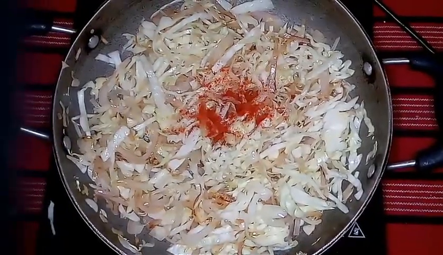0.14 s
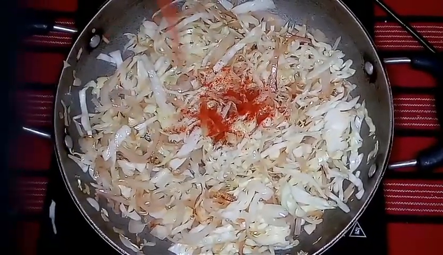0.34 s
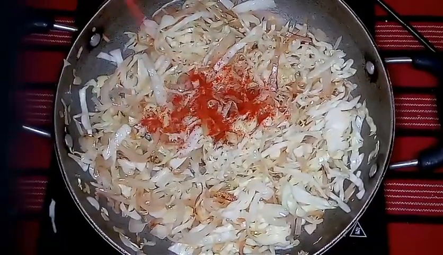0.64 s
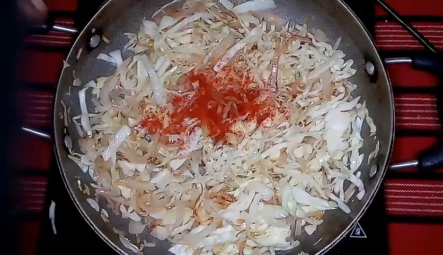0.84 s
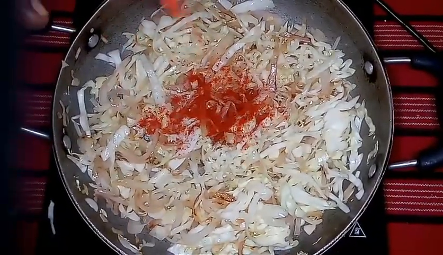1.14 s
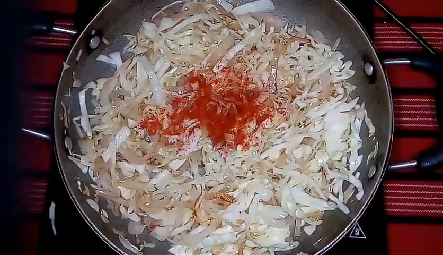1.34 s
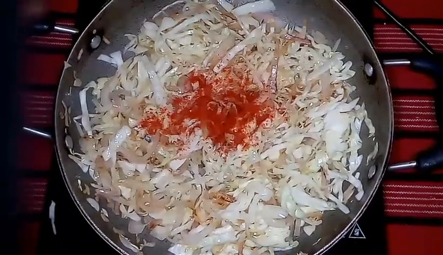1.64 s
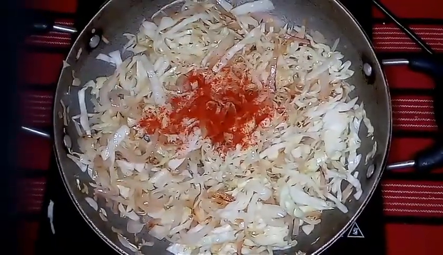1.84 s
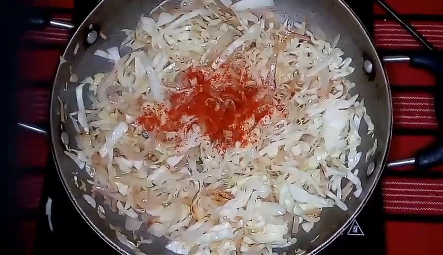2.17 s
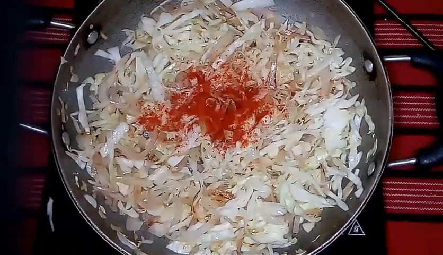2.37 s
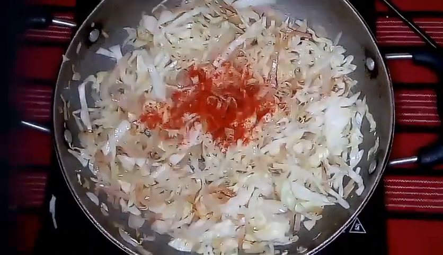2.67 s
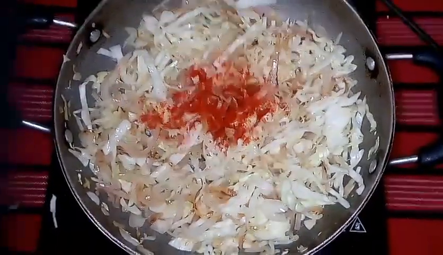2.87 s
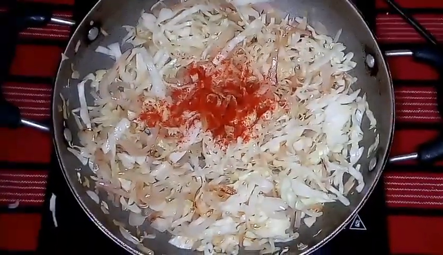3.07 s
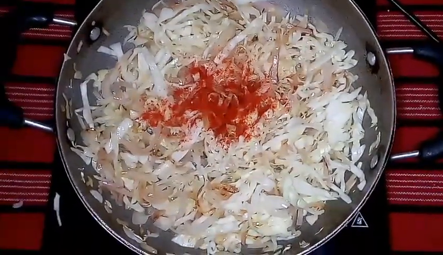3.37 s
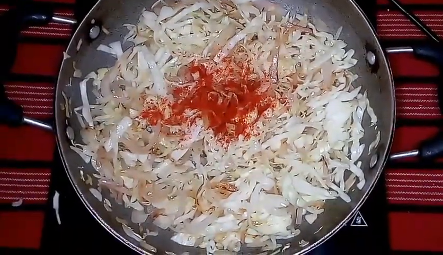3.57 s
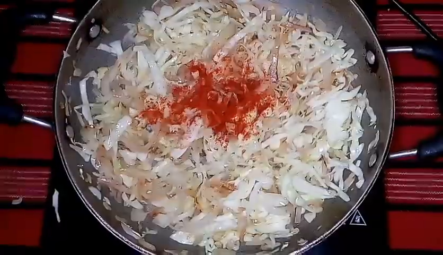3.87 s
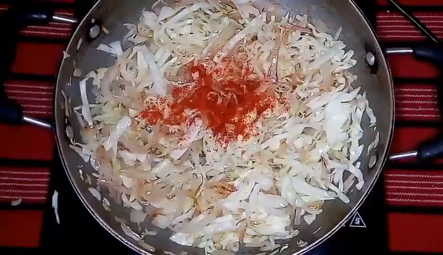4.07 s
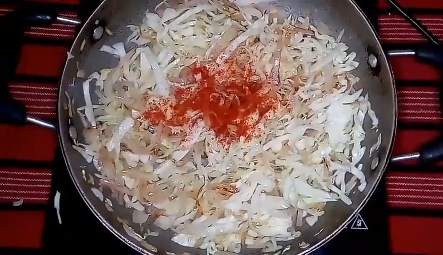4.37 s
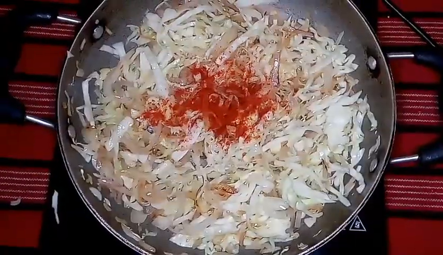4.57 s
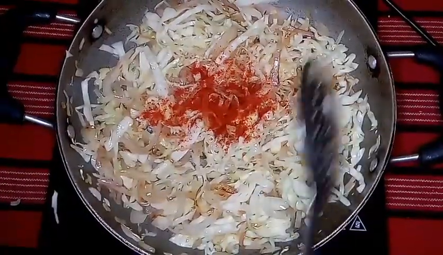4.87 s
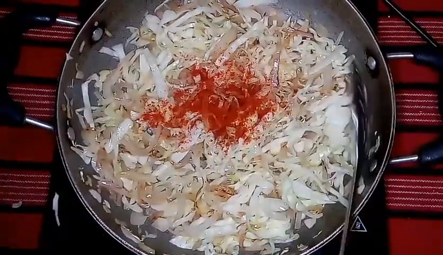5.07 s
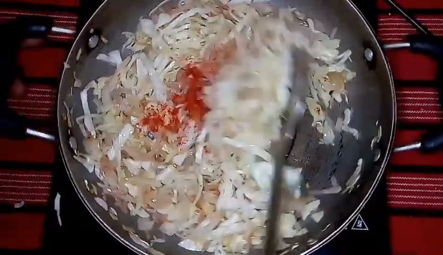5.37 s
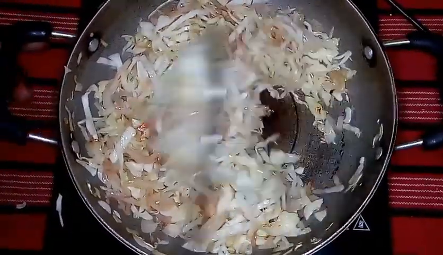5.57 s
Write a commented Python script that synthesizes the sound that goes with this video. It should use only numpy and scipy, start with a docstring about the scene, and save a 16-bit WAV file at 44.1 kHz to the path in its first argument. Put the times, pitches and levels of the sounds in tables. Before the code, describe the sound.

Close above a steel pan in a small kitchen, sliced onions sizzle evenly with small oil snaps, over a low induction hum and soft fan air. A few faint dull bumps come and go. Just after five seconds a spatula knocks the pan, scrapes, groans briefly and crunches through the onions, making the frying flare. One close microphone, centred, with a short room tail.

```python
"""Close above a steel pan on an induction cooktop, one microphone hears sliced onions sizzle from the start.
The coil hums at twice the mains frequency, the fan whirs under the plate: sines, and noise through resonances.
Steam bursts are random clicks and hiss, coloured; now and then a droplet snaps, or a dull or hollow note sounds.
Near the end a spatula scrapes, crunches, knocks and groans on the pan: clicks, ringing modes and gliding sines.
Its shoves make the frying flare; a short tail from the nearby walls follows all but the coil and fan."""
import sys
import numpy as np
from scipy import signal
from scipy.fft import rfft, irfft, next_fast_len
from scipy.io import wavfile

SR = 44100
rng = np.random.default_rng(int(sys.argv[2]) if len(sys.argv) > 2 else 0)


def persist_wave(psi):
    """Save psi, clipped to +-1, as 16-bit WAV."""
    counts = np.round(np.clip(psi, -1, 1) * 32767).astype(np.int16)
    wavfile.write(sys.argv[1], SR, np.atleast_2d(counts).T)


N = 252290
TIME = np.arange(N) / SR  # seconds

# Colour of the bursting steam bubbles. Each row: frequency in Hz, relative spectrum level in dB.
SIZZLE_COLOUR = [(700, -36), (1600, -15.5), (2400, -15), (3000, -12), (3400, -8), (4500, -1.5), (5400, 0),
                 (6500, -0.5), (6800, -5.5), (7400, -8.5), (8000, -15), (9900, -22), (11300, -29),
                 (13000, -31), (15400, -56)]
# Low modes of the loaded pan and spatula. Each row: frequency in Hz, relative level in dB, t60 in seconds.
PAN_MODES = [(338, -8, 0.063), (404, -6, 0.1), (470, -0.5, 0.061), (625, -14, 0.06), (694, -10, 0.076)]
# Clanking modes of the pan's wall. Each row: frequency in Hz, relative level in dB, t60 in seconds.
WALL_MODES = [(897, -17, .075), (1070, -15, .06), (1190, -8.5, .085), (1337, -9, .075), (1470, -17, .05),
              (1985, -11, .06), (2190, -14, .06)]
# Bright modes of the steel rim. Each row: frequency in Hz, relative level in dB, t60 in seconds.
RIM_MODES = [(2610, -10, 0.047), (4170, -19, 0.036), (5080, -0.5, 0.053), (5600, -11, .04),
             (7560, -20, .025)]
# Shoves of the spatula. Each row: start in seconds, length in seconds, then the levels that a long shove
# would reach: edge in dB, dull rubbing in dB, flare of the frying in dB, crunch of the onions in dB.
SHOVES = [(5.173, 0.01, -46, -48, -46, -44), (5.22, 0.029, -52, -38, -42, -42),
          (5.292, 0.071, -62, -44, -43, -40), (5.383, 0.038, -48, -56, -34.5, -36),
          (5.565, 0.061, -56, -72, -41.5, -43)]
SHOVE_ATTACK_S, SHOVE_RELEASE_S = 0.006, 0.025


def from_db(db):
    """Decibels to gain."""
    return 10 ** (np.asarray(db) / 20)


def rms_one(x):
    """Scale to unit power."""
    return x / np.sqrt(np.mean(x ** 2) + 1e-20)


def in_time(rows):
    """The columns of a curve, one value per sample."""
    s, *columns = np.transpose(rows)
    return [np.interp(TIME, s, column) for column in columns]


def drift(rate_hz):
    """Slow random curve of rms 1: noise through two equal low-pass poles, made at every 40th sample."""
    r = np.exp(-80 * np.pi * rate_hz / SR)
    noise = rng.standard_normal(N // 40 + 2002)
    slow = signal.lfilter([1], [1, -2 * r, r * r], noise)[2000:]  # drop the filter's run-in
    return np.interp(np.arange(N) / 40, np.arange(len(slow)), rms_one(slow))


def colour(x, spectrum):
    """Causal (minimum-phase) filter that follows a spectrum."""
    hz, db = np.transpose(spectrum)
    size = 2 * next_fast_len(N // 2 + 4096)
    grid = np.maximum(np.arange(size // 2 + 1) * SR / size, 1)
    gain = from_db(np.interp(np.log(grid), np.log(hz), db))
    # folding the cepstrum onto positive times gives the minimum phase
    cepstrum = irfft(np.log(gain))
    cepstrum[1:size // 2] *= 2
    cepstrum[size // 2 + 1:] = 0
    return irfft(rfft(x, size) * np.exp(rfft(cepstrum)))[:N]


def resonate(x, hz, width_hz):
    """One two-pole resonance with a gain of about 1 at its peak."""
    r = np.exp(-np.pi * width_hz / SR)
    zeros = np.array([1, 0, -1]) * (1 - r * r) / 2
    poles = [1, -2 * r * np.cos(2 * np.pi * hz / SR), r * r]
    return signal.lfilter(zeros, poles, x)


def ring(clicks, hz, t60):
    """A unit click sets a decaying sine of starting height 1 ringing."""
    r = np.exp(-np.log(1000) / (t60 * SR))
    w = 2 * np.pi * hz / SR
    return signal.lfilter([0, np.sin(w)], [1, -2 * r * np.cos(w), r * r], clicks + 1e-18)


def clicks_at(times, db):
    """Single clicks of given strengths."""
    out = np.zeros(N)
    np.add.at(out, np.round(np.asarray(times) * SR).astype(int), from_db(db))
    return out


def grains(per_s, spread_db, largest):
    """Random clicks of either sign, many small and a few large; rms 1."""
    steps = np.minimum(rng.exponential(1, N), largest)
    sizes = from_db(spread_db * steps) * rng.choice([-1, 1], N)
    return rms_one(sizes * (rng.random(N) < per_s / SR))


def tone(hz):
    """A sine of rms 1 that follows a pitch curve from a random phase."""
    return np.sqrt(2) * np.sin(2 * np.pi * (np.cumsum(hz) / SR + rng.random()))


def swell(start, length, attack, release):
    """Envelope that rises towards 1 for a length, then dies away; times in seconds."""
    since = np.maximum(TIME - start, 0)
    return (1 - np.exp(-since / attack)) * np.exp(-np.maximum(since - length, 0) / release)


def dying(times, db, decay_s):
    """Envelope that jumps at given times and dies away."""
    return signal.lfilter([1], [1, -np.exp(-1 / (decay_s * SR))], clicks_at(times, db) + 1e-18)


def coil(flutter_db=0.48, octave_db=-33):
    """The field pulls on the pan twice per mains cycle: an almost pure hum with a faint octave."""
    # Hum under the resting pan. Each row: time in seconds, level in dB.
    resting_hum = [(0.1, -40), (2.12, -39.5), (2.24, -40), (2.77, -40.5), (3.51, -42), (5.0, -41)]
    level_db, = in_time(resting_hum)
    # the spatula's weight damps the hum
    damping_db = -3 * swell(start=5.23, length=0.47, attack=0.014, release=0.014)
    # the pan rocks and hums louder for a moment
    rocking_db = 7.5 * np.exp(-((TIME - 5.395) / 0.014) ** 2)
    pitch = np.full(N, 100.06)  # Hz
    hum = tone(pitch) + from_db(octave_db) * tone(2 * pitch)
    return from_db(level_db + damping_db + rocking_db + flutter_db * drift(3.9)) * hum


def fan(turn_hz=49.45, whine_hz=1129.3, air_db=-50.5, whine_db=-63.5, gust_db=0.7, wobble=0.00063, waver_db=1):
    """Turbulent air rings the housing; rotor tones and the motor's whine share one slightly wobbling speed."""
    # Air rushing through the housing. Each row: frequency in Hz, relative spectrum level in dB.
    air_colour = [(20, -5), (45, -10), (75, 1.5), (125, 5.5), (170, -2.5), (260, 2), (420, 0), (505, 2.5),
                  (540, -2.5), (585, 3), (640, 0.5), (900, -2), (1120, -1.5), (1500, -16), (3000, -14.5),
                  (9000, -30.5)]
    # Steady tones of the fan. Each row: multiple of its turning rate, level in dB.
    rotor_orders = [(3, -62.5), (5, -68.5), (6, -66), (10, -61), (15, -70), (17, -73), (20, -66.5)]
    # Resonances of the housing. Each row: frequency in Hz, nominal width in Hz, level in dB.
    housing_modes = [(133, 3.3, -69), (330, 18.3, -54), (371.4, 11, -65), (416, 22, -62), (458, 32, -57),
                     (495.7, 16, -55), (617, 45, -59.5), (771.5, 34, -62.5), (1043, 19, -70.5),
                     (1359, 11.6, -70)]
    air = from_db(air_db) * rms_one(colour(rng.standard_normal(N), air_colour))
    gusts = gust_db * drift(1.7)  # the airflow is nearly even
    for hz, width, db in housing_modes:
        # two passes of twice the width make steeper skirts
        once = resonate(rng.standard_normal(N), hz, 2 * width)
        air += from_db(db + gusts) * rms_one(resonate(once, hz, 2 * width))
    speed = 1 + wobble * drift(1.88)
    rotor = np.zeros(N)
    for order, db in rotor_orders:
        rotor += from_db(db + waver_db * drift(4.2)) * tone(order * turn_hz * speed)
    whine = from_db(whine_db + waver_db * drift(1.7)) * tone(whine_hz * speed)
    return air + rotor + whine


def vigour(gain_db=-0.5, restless_db=0.5, flare_attack_s=0.023, flare_release_s=0.07):
    """Strength of the frying: a simmer, plus a flare per shove as wet onion lands on hot steel and dries off."""
    # Undisturbed frying. Each row: time in seconds, level in dB ahead of gain_db.
    simmer_levels = [(0.05, -39), (0.53, -37.5), (1.2, -39.5), (2.46, -38.5), (3.37, -38.5), (4.11, -39.5),
                     (5.15, -38.5)]
    level_db, = in_time(simmer_levels)
    simmer = from_db(gain_db + level_db + restless_db * drift(0.98))
    power = simmer ** 2
    for s, length, _, _, flare_db, _ in SHOVES:
        flare = from_db(flare_db) * swell(s, length, flare_attack_s, flare_release_s)
        power += flare ** 2
    return np.sqrt(power)


def frying(bubbles_per_s=9000, bubbles_db=-2, steam_db=-4.0, sputter_db=1.5,
           fizz_db=-8, fizz_per_s=140, fizz_width_hz=400, patchy_db=3.0):
    """Thousands of tiny steam bursts a second over a smooth hiss; some ring briefly at a pitch of their own."""
    sputter = from_db(bubbles_db + sputter_db * drift(23))
    bursts = sputter * grains(bubbles_per_s, spread_db=1.0, largest=4)
    fizz = np.zeros(N)
    for hz in np.linspace(2200, 14500, 36):
        # each wet spot fizzes at its own pitch, and comes and goes
        spot = resonate(grains(fizz_per_s, spread_db=1.0, largest=5.8), hz, fizz_width_hz)
        fizz += from_db(patchy_db * drift(9.1)) * spot
    steam = from_db(steam_db) * rng.standard_normal(N)
    sizzle = bursts + from_db(fizz_db) * rms_one(fizz) + steam
    # once the onions are pushed aside, the bare oil fizzes unmuffled above 12 kHz
    bare = rms_one(signal.sosfilt(signal.butter(2, 12000, "high", fs=SR, output="sos"), sizzle))
    since_bared = np.maximum(TIME - 5.38, 0)
    bared = from_db(-66 + 2 * drift(12)) * (1 - np.exp(-since_bared / 0.03))
    return vigour() * rms_one(colour(sizzle, SIZZLE_COLOUR)) + bared * bare


def pops(level_db=-0.5, width_hz=1500, ring_share=0.97, crack_db=-24, small_per_s=3.1, small_db=-28, small_spread_db=1.5):
    """Droplets burst with a snap; the larger ones add a short ring of their cavity."""
    # Loudest droplets in the oil. Each row: time in seconds, snap in dB ahead of level_db, bubble pitch in Hz.
    large_pops = [(0.349, -22, 2300), (0.4527, -21.5, 5100), (0.493, -24, 2400), (0.6974, -23, 3400),
                  (0.8386, -24, 5000), (2.0847, -23.5, 5500), (2.3891, -19, 5200), (3.1316, -24, 5600),
                  (3.193, -23.5, 5500), (3.3592, -24, 4800), (3.4615, -23.5, 5000), (3.4968, -20.5, 5400),
                  (5.2546, -16, 5000), (5.5715, -23.5, 4520), (5.581, -23.5, 5200)]
    # smaller droplets pop at random
    small_sizes = from_db(small_db + small_spread_db * rng.standard_normal(N))
    out = (rng.random(N) < small_per_s / SR) * small_sizes
    for s, db, hz in large_pops:
        snap = clicks_at([s], [db])
        out += snap + ring_share * resonate(snap, hz, width_hz)
    # the peak of one coloured unit click
    height = np.abs(colour(clicks_at([0], [0]), SIZZLE_COLOUR)).max()
    # a little of each snap reaches the microphone unmuffled by the onions
    crack = from_db(crack_db) * np.diff(out, prepend=0)
    return from_db(level_db) * (colour(out, SIZZLE_COLOUR) / height + crack)


def bumps(lowest_hz=50):
    """Dull, quickly damped knocks and a few faint hollow notes near 500 Hz: decaying sines, deep bass cut."""
    # Soft knocks and hollow notes. Each row: time in seconds, frequency in Hz, level in dB, t60 in seconds.
    soft_notes = [(2.088, 456, -37, 0.079), (2.59, 502, -37, 0.12), (2.672, 487, -39, 0.1),
                  (3.078, 323, -35, 0.078), (4.013, 247, -38, 0.056), (4.335, 253, -31, 0.033),
                  (5.194, 130, -35, 0.042), (5.244, 214, -40, 0.05), (5.346, 230, -42, 0.04),
                  (5.376, 220, -38, 0.032), (5.385, 65, -41, 0.2), (5.411, 205, -44, 0.099),
                  (5.457, 191, -44, 0.09)]
    notes = sum(ring(clicks_at([s], [db]), hz, t60) for s, hz, db, t60 in soft_notes)
    return signal.sosfilt(signal.butter(2, lowest_hz, "high", fs=SR, output="sos"), notes)


def scrape(catches_per_s=350, width_hz=70, grit_db=-12, rim_db=-6, soft_hz=8000):
    """The blade catches on the steel in gritty clicks: its flat rubs the low modes, its edge the upper ones."""
    edge_gain, rub_gain = np.zeros((2, N))
    for s, length, edge_db, rub_db, *_ in SHOVES:
        push = swell(s, length, SHOVE_ATTACK_S, SHOVE_RELEASE_S)
        edge_gain += from_db(edge_db) * push
        rub_gain += from_db(rub_db) * push
    catches = grains(catches_per_s, spread_db=6.5, largest=3.4)
    catches = signal.sosfilt(signal.butter(2, soft_hz, fs=SR, output="sos"), catches)

    def excite(modes):
        """The same catches drive every mode of one part of the pan."""
        return sum(from_db(db) * resonate(catches, hz, width_hz) for hz, db, t60 in modes)

    rub = rms_one(resonate(excite(PAN_MODES), 397, 230))
    edge = rms_one(excite(WALL_MODES))
    # the rim's modes are all driven alike
    rim = rms_one(sum(resonate(catches, hz, width_hz) for hz, db, t60 in RIM_MODES))
    grit = rms_one(resonate(catches, 2300, 910))
    return rub_gain * rub + edge_gain * (edge + from_db(rim_db) * rim + from_db(grit_db) * grit)


def crunch(snaps_per_s=700, clump_rate_hz=60, clump_db=3):
    """Shreds of onion snap and spit under the blade in uneven clumps as they are pushed."""
    push = np.zeros(N)
    for s, length, *_, crunch_db in SHOVES:
        push += from_db(crunch_db) * swell(s, length, SHOVE_ATTACK_S, SHOVE_RELEASE_S)
    clumps = from_db(clump_db * drift(clump_rate_hz))
    snaps = clumps * grains(snaps_per_s, spread_db=1.5, largest=2.2)
    return push * rms_one(colour(snaps, SIZZLE_COLOUR))


def blows(scratch_s=0.0026, click_s=0.0019, click_hz=7600, click_width_hz=3000, click_top_hz=9800,
          uneven_db=1.5, detune_hz=14, contact_s=0.0003):
    """The spatula thuds on the pan floor, rings wall and rim, skids briefly and clicks on bare steel."""
    # Blows on the pan. Each row: time in seconds, thud in dB, wall ring in dB, rim ring in dB,
    # scratch in dB, click in dB.
    spatula_blows = [(5.1862, -34, -32, -44, -28, -30), (5.1905, -33, -28, -48, -38, -37),
                     (5.196, -32, -30, -46, -42, -58), (5.2055, -46, -40, -38, -36, -60),
                     (5.2241, -41, -42, -26, -25.5, -43), (5.233, -43, -40, -31, -40, -60),
                     (5.253, -43, -44, -42, -44, -54), (5.284, -44, -43, -42, -38, -60),
                     (5.317, -48, -52, -36, -35, -60), (5.3435, -50, -52, -34, -32, -55),
                     (5.3545, -48, -54, -35, -30, -55), (5.383, -35, -46, -38, -33, -60),
                     (5.3925, -40, -40, -35, -30, -52), (5.407, -42, -38, -38, -34, -55),
                     (5.4225, -46, -40, -35, -27, -50), (5.4303, -46, -39, -35, -28, -48),
                     (5.4374, -47, -41, -34, -27, -50), (5.444, -42, -37, -42, -36, -56),
                     (5.457, -48, -48, -40, -33, -60)]
    s, thud_db, wall_db, rim_db, scratch_db, click_db = np.transpose(spatula_blows)
    out, t = np.zeros(N), TIME[:SR // 5]
    onset = 1 - np.exp(-t / contact_s)  # the blade meets the pan through a film of oil
    for modes, blow_db in ((PAN_MODES, thud_db), (WALL_MODES, wall_db), (RIM_MODES, rim_db)):
        hz, db, t60 = np.transpose(modes)[:, :, None]
        decay = np.exp(-np.log(1000) * t / t60)
        for at, strength_db in zip(s, blow_db):
            # the point of contact sets how hard each mode is pushed, and the blade's weight detunes it
            push, shift, side = rng.standard_normal((3, len(modes), 1))
            height = np.sign(side) * from_db(strength_db + db + uneven_db * push)
            ringing = height * np.sin(2 * np.pi * (hz + detune_hz * shift) * t)
            i = int(at * SR)
            out[i:i + len(t)] += (ringing * onset * decay).sum(axis=0)[:N - i]
    skid = dying(s, scratch_db, scratch_s) * rms_one(colour(rng.standard_normal(N), SIZZLE_COLOUR))
    click_noise = rms_one(resonate(rng.standard_normal(N), click_hz, click_width_hz))
    click = dying(s, click_db, click_s) * click_noise
    return out + skid + signal.sosfilt(signal.butter(4, click_top_hz, fs=SR, output="sos"), click)


def judder(gain_db=-2.5, jitter=0.0345, lower_ratio=0.76, lower_wander=0.08, lower_db=-8, rough_db=2):
    """The blade groans on the pan in several short groans with near-silent gaps, their pitch gliding."""
    # Groans of the juddering blade. Each row: time in seconds, pitch in Hz, level in dB ahead of gain_db.
    groan_curve = [(5.186, 480, -36), (5.195, 452, -18.5), (5.203, 385, -29), (5.221, 405, -34),
                   (5.232, 494, -29), (5.255, 422, -33), (5.263, 463, -47), (5.27, 480, -36),
                   (5.301, 440, -34), (5.312, 419, -53), (5.326, 494, -31.5), (5.354, 432, -31),
                   (5.369, 411, -46), (5.385, 344, -28.5), (5.405, 328, -35.5), (5.435, 322, -49)]
    hz, level_db = in_time(groan_curve)
    start, end = groan_curve[0][0], groan_curve[-1][0]
    within = (TIME > start) & (TIME < end)
    # once the blade slides, a lower mode beats against the groan
    sliding = swell(5.235, 0.13, SHOVE_ATTACK_S, SHOVE_RELEASE_S)
    lower = from_db(lower_db) * sliding * tone(lower_ratio * hz * (1 + lower_wander * drift(31.5)))
    groan = tone(hz * (1 + jitter * drift(101)))
    strength = from_db(gain_db + level_db + rough_db * sliding * drift(70))
    return strength * within * (groan + lower)


def kitchen(x, t60=0.44, wet_db=-13, first_echo_s=0.0035):
    """A short diffuse tail from the nearby walls: decaying noise as the room's response."""
    t = TIME[:SR // 2]
    tail = rng.standard_normal(len(t)) * np.exp(-np.log(1000) * t / t60) * (t > first_echo_s)
    return x + from_db(wet_db) * signal.fftconvolve(x, tail / np.linalg.norm(tail))[:N]


def scene():
    """Cooktop and pan, the same in both channels; all but the coil and fan get the room's tail."""
    in_room = frying() + pops() + bumps() + scrape() + crunch() + blows() + judder()
    mono = coil() + fan() + kitchen(in_room)
    return np.stack([mono, mono])


def record(dry):
    """The microphone's top is cut steeply at 15.5 kHz."""
    return signal.sosfilt(signal.ellip(12, .1, 80, 15500, fs=SR, output="sos"), dry)


dry = scene()
out = record(dry)
persist_wave(out)
```